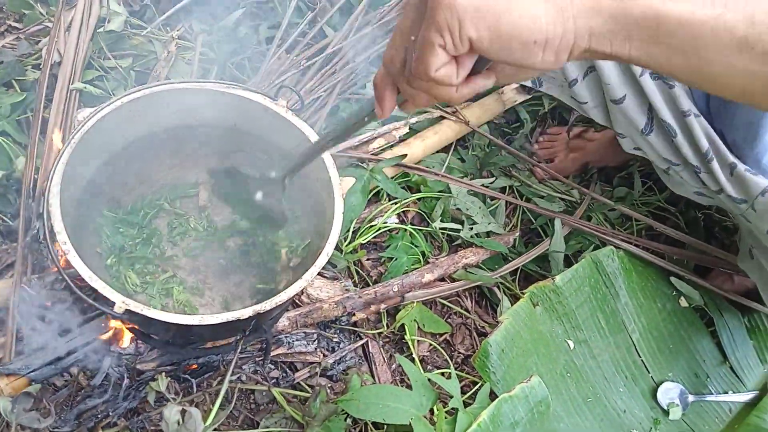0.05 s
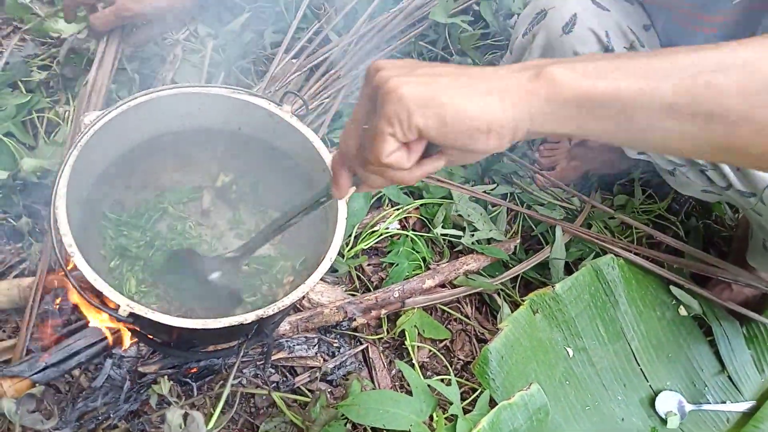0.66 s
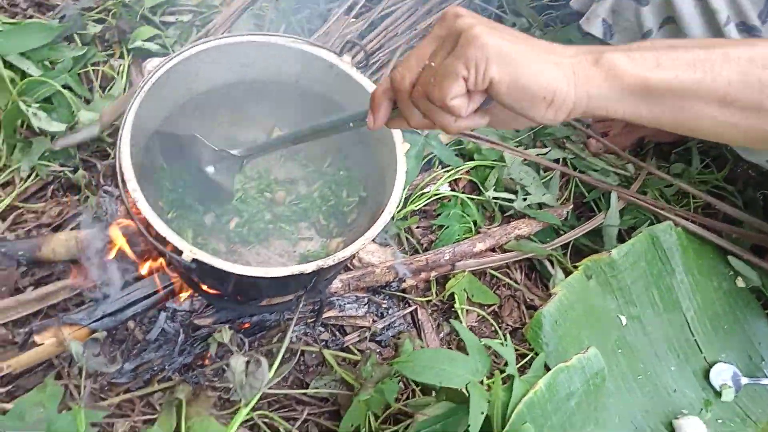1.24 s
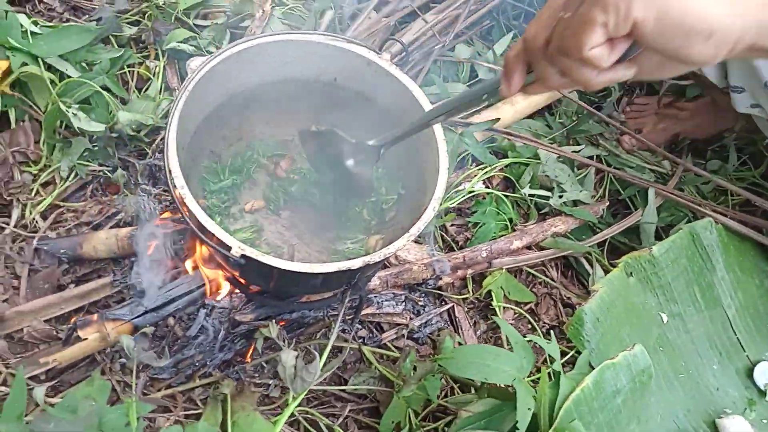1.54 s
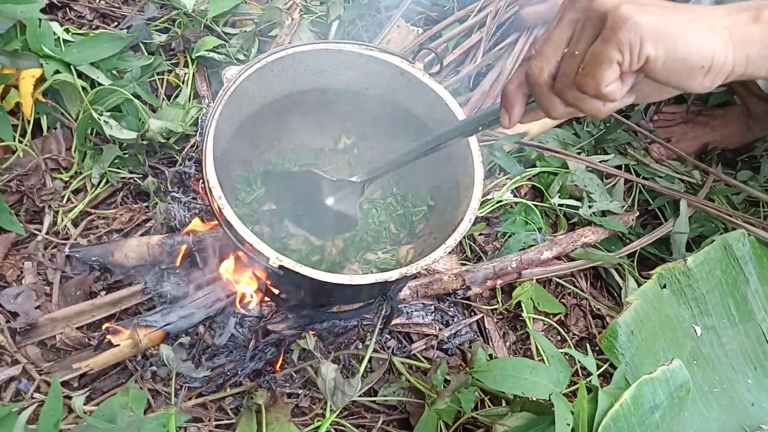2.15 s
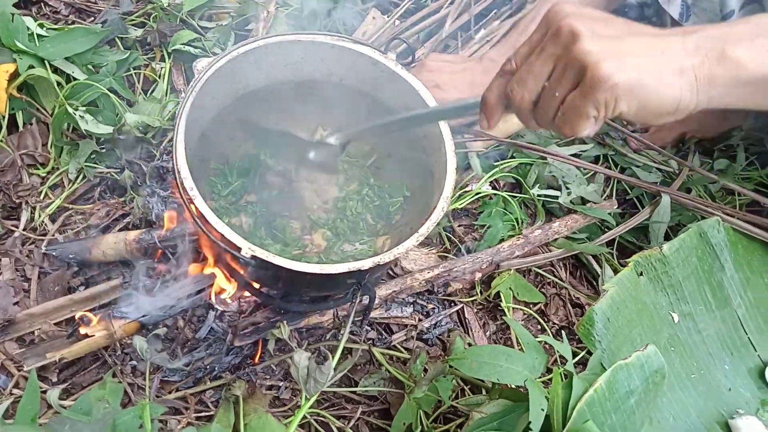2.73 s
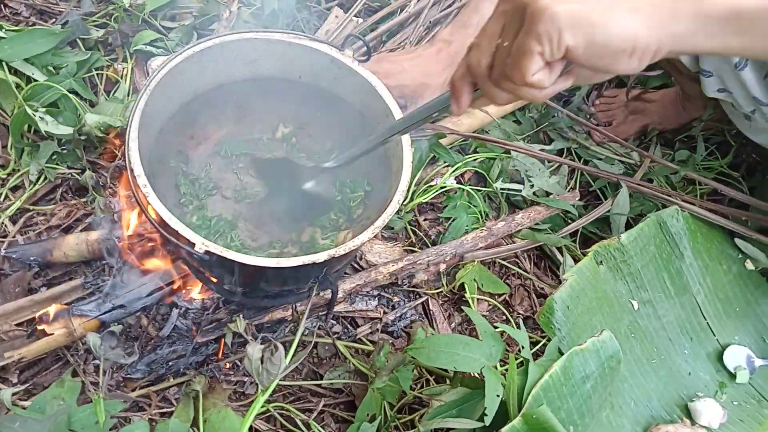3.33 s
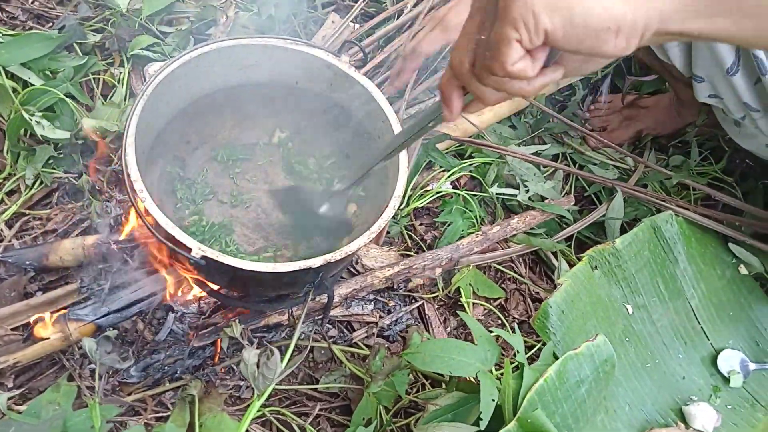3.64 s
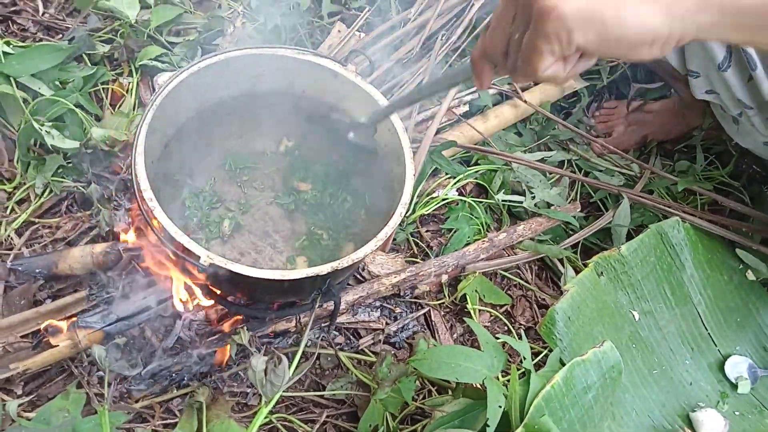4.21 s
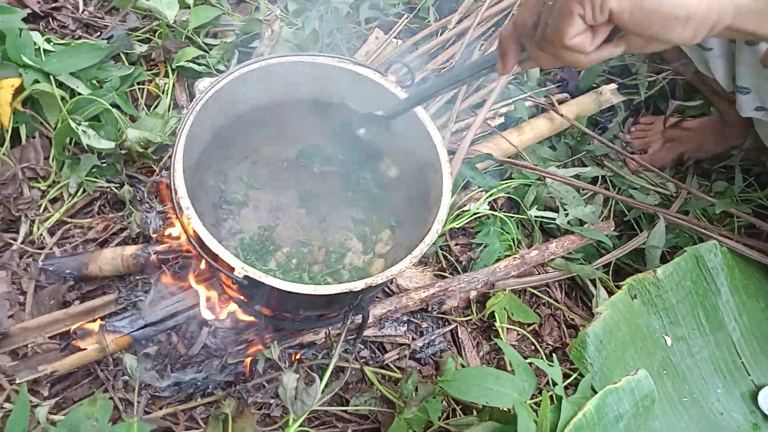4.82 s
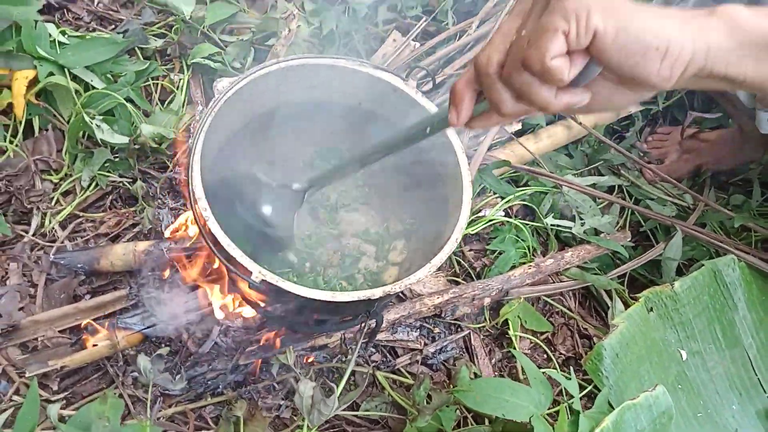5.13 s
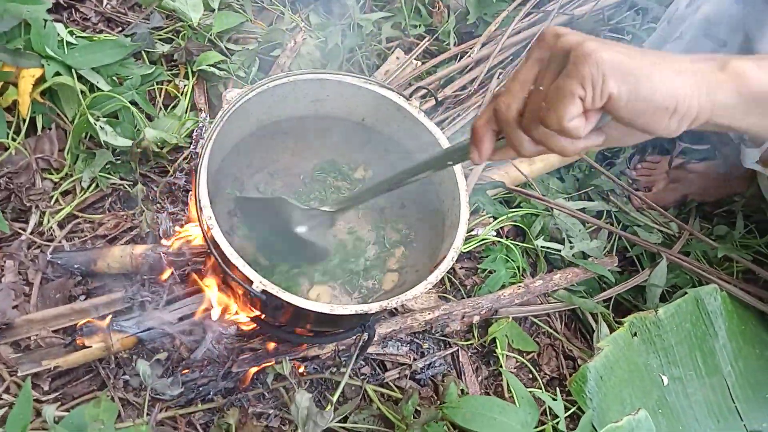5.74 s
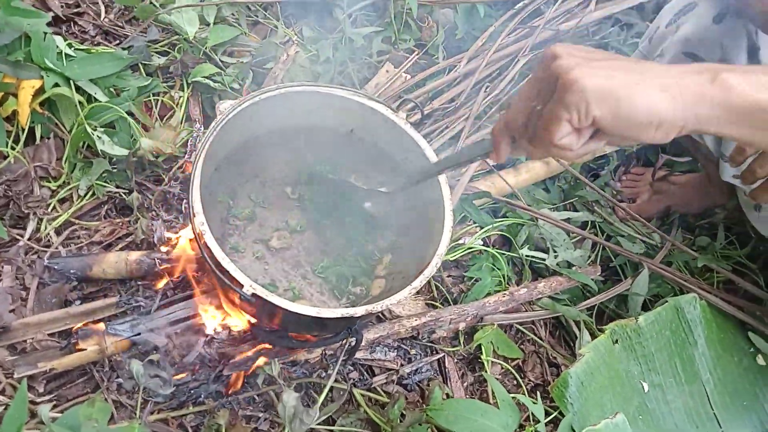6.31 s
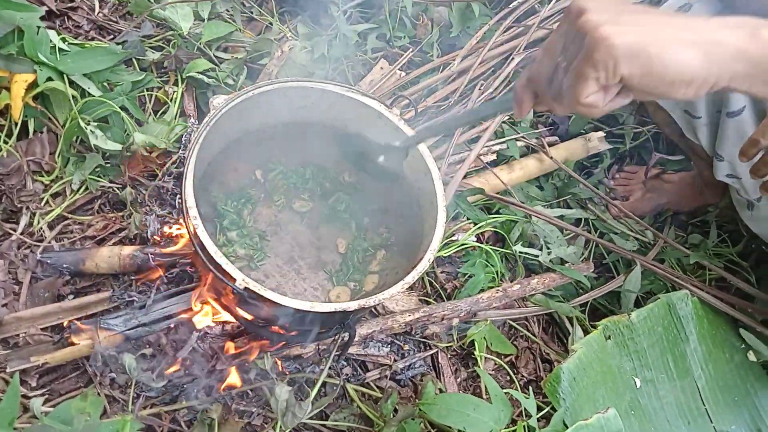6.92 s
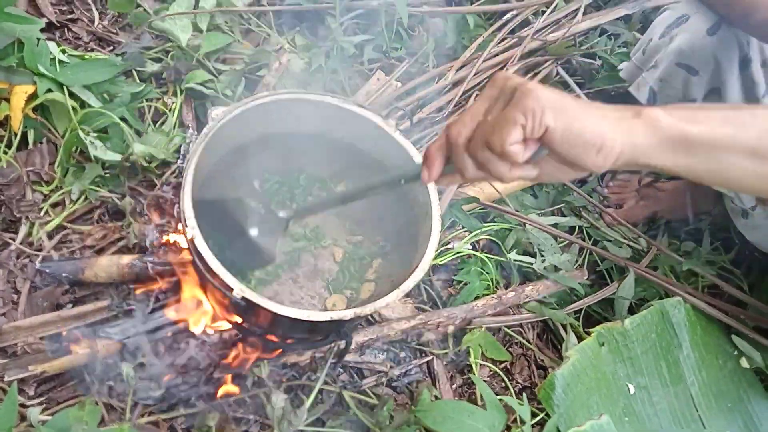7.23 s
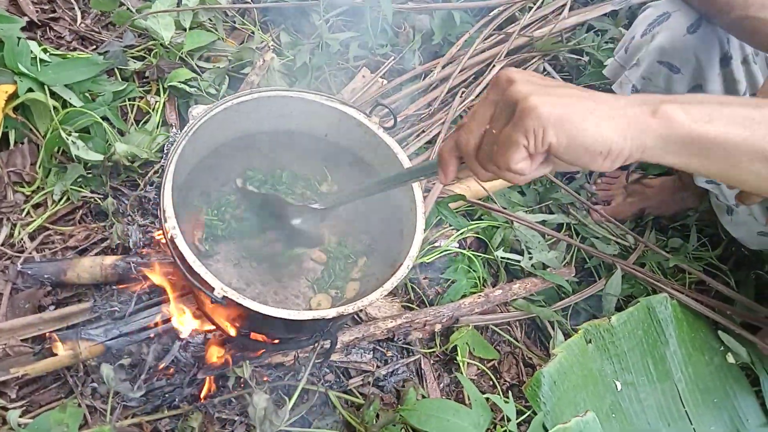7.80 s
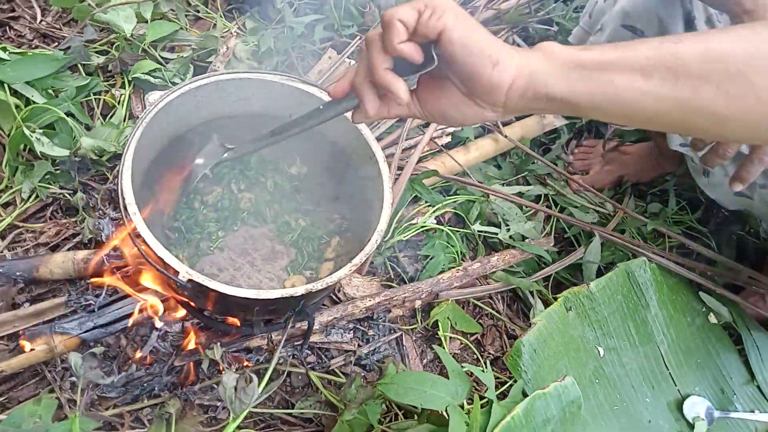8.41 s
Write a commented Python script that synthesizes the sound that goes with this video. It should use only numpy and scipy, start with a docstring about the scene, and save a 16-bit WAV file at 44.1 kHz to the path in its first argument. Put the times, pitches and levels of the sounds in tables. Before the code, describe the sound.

Close stirring of broth in an aluminium pot, with metal clatter, small plops and hissing above a faint wood fire.

```python
"""At an open wood fire, one microphone close above an aluminium pot: a metal ladle stirs broth.
The handle chatters on the rim, rings and squeaks; the bowl knocks and scrapes under the broth,
which damps the pot. The broth swirls and plops, and sizzles where it washes up the hot wall.
Underneath, the wood crackles and the flames rumble."""
import sys
import numpy as np
from scipy import signal
from scipy.fft import rfft, irfft
from scipy.io import wavfile
from scipy.ndimage import uniform_filter1d

SR = 44100
rng = np.random.default_rng(int(sys.argv[2]) if len(sys.argv) > 2 else 0)


def output_pcm(signal):
    """Save a mono or channel-first signal as 16-bit PCM at the path in sys.argv[1].

    Samples are clipped to [-1, 1] before scaling.
    """
    pcm = np.clip(np.atleast_2d(signal).T, -1, 1) * 32767
    wavfile.write(sys.argv[1], SR, np.round(pcm).astype(np.int16))


N = 377487
CUTOFF_HZ = 15700
BLOW_T = np.arange(SR * 3 // 10) / SR   # time axis of one short event, s

# spectrum of tiny bursts, shared by sizzling broth and snapping wood: frequency_hz, density_db
BURST_SPECTRUM = [(500, -14), (1000, -8), (1600, -4.5), (2500, 1), (3500, 2.5), (4500, -2), (5500, -8.5),
                  (6800, -8.5), (7700, -5.5), (8500, 4.5), (9500, -3.5), (11000, -6.5), (12800, -6.5),
                  (15300, -2)]


def handle_on_rim(crowd, clatter_db, ring_db, t60_s):
    """The handle clashes brightly on the rim in the open air, after which the ladle rings."""
    # clashes: start_s, level_db, treble_db, resonance_db, contact_s, low_ring_db, high_ring_db
    rim_hits = [(0.2147, -18.5, -2, 9, .016, -26.5, -23), (.511, -13, 3, 11.5, 0.021, -22, -21),
                (1.004, -22, -1.5, 11, 0.012, -16.5, -29), (1.255, -14, 3.5, 13, 0.016, -32, -31),
                (1.8536, -28.5, -0.5, 9, 0.017, -20, -33), (2.374, -17.5, -9, 2, 0.017, -27.5, -19.5),
                (2.927, -15, -3.5, 11, 0.0032, -16, -17), (3.586, -17.5, -1.5, 19.5, 0.013, -15, -27.5),
                (3.8903, -15.5, -1, 13, 0.0058, -35, -24), (4.2507, -14.5, -1.5, 11, 0.0074, -13.5, -26),
                (4.57, -14, -1, 12, 0.022, -23, -20), (4.9397, -18.5, -12, 0, 0.0042, -18, -21),
                (5.1941, -18.5, -1, 8.5, 0.023, -36, -27), (5.276, -29, 2, 13, .003, -28.5, -37),
                (5.6024, -17.5, -4.5, 6, 0.0099, -18.5, -16), (5.85, -14, 3, 15.5, 0.017, -31, -28),
                (6.259, -24.5, -11, -5, 0.026, -24, -28), (6.9479, -16.5, -1, -5, 0.01, -23.5, -14),
                (7.2593, -15.5, 3, 14.5, 0.0127, -30, -22), (7.682, -15, 0.5, -8, 0.0082, -16.5, -25),
                (7.955, -16, 4.5, 17.5, .019, -20, -19), (8.379, -15.5, -0.5, 1, 0.0072, -27.5, -18.5)]
    # clear modes of the ladle: pitch_hz, level_db, ring_time_share
    ladle_modes = [(1677, 2.5, 1.0), (2955, 0, 1.0), (3260, -2, .45), (5645, -14, .5), (6105, -10, .35),
                   (517, -14, 1.1), (2590, -5, .4), (2890, -6, .6), (3520, -5, .4), (4140, -7, .45),
                   (8290, -3, .35), (8490, -4, .35)]
    # spectrum of the quickly dying modes around them: frequency_hz, density_db
    rim_spectrum = [(200, -11.5), (330, -34), (510, -0.5), (800, -9.5), (950, -6), (1150, -1), (1500, -6.5),
                    (2200, 0), (3000, -3.5), (4300, -2), (5400, -9), (7200, -9), (8300, 0.5), (9500, -11),
                    (11500, -21)]
    out = np.zeros(N)
    for start_s, level_db, treble_db, resonance_db, contact_s, low_db, high_db in rim_hits:
        resonance_hz = 1260 * (1 + 0.0098 * rng.standard_normal())   # shifts with the point of contact
        bass_db = 1.5 - 0.45 * (level_db + 18)   # harder clashes carry less bass for their level
        force = chatter(contact_s, per_s=1700, uneven_db=2.8, impact=0.5,
                        slide_db=-12, slide_s=0.018, ease_s=0.0005)
        clash = clatter(force, crowd, rim_spectrum, bass_db, treble_db,
                        resonance_hz, resonance_db, overtone_db=5.5, log_width=0.048)
        ring = ringing(contact_s, ladle_modes, low_db, high_db, t60_s)
        add(out, start_s, from_db(level_db + clatter_db) * clash + from_db(ring_db) * ring)
    return out


def bowl_in_pot(crowd, clatter_db, ring_db, t60_s):
    """Duller touches under the broth: brief ones knock, long ones ease into a gritty scrape."""
    # bowl against wall and bottom; the deeper in the broth, the more bass:
    # start_s, level_db, bass_db, treble_db, contact_s, ring_db
    knocks = [(.356, -25, -7, -7, 0.019, -43), (.371, -22.5, 2, 2.5, 0.0072, -36),
              (.5954, -17, 0, 5.5, 0.0035, -38), (.6431, -24.5, 17, -29, 0.0011, -43),
              (.6959, -24.5, 10, -11, 0.0055, -42), (.7265, -31.5, 4, 0, 0.0095, -33.5),
              (1.1169, -12, -20, -3.5, 0.0023, -30), (1.131, -19.5, -18, 5, 0.0017, -46),
              (1.325, -32.5, 17, 7, .002, -67), (1.383, -17, 8.5, -5, 0.00093, -38),
              (1.472, -24, -13, -1, 0.014, -30.5), (1.4945, -16, -14, -4, 0.0031, -31.5),
              (1.9292, -27.5, 8.5, 5, 0.017, -45), (2.0249, -32.5, 7, 7, 0.023, -51),
              (2.63, -23.5, -11, 1.5, .004, -36), (3.057, -19.5, -4, -31, 0.00088, -44.5),
              (3.2088, -23, 11.5, 3, 0.016, -25), (3.277, -27, 10, -21, 0.031, -32.5),
              (3.9959, -15, 12, -14, .0013, -35), (4.018, -21, 7.5, -0.5, 0.017, -31),
              (4.053, -30, -14, 8, .0033, -36.5), (4.3843, -18, -5.5, -1, 0.021, -30),
              (4.6422, -20, 10.5, -15, 0.026, -27.5), (5.026, -22.5, 7, 1, 0.014, -44),
              (5.258, -18, -5, 9, 0.00068, -67), (5.276, -38, 5, 8, .003, -63),
              (5.3577, -23.5, 10, 0, 0.014, -32.5), (6.602, -37, 11, 12, 0.027, -62),
              (7.089, -26, 3, 4, 0.0046, -49), (7.3825, -21, 18, -5, 0.0037, -44),
              (7.437, -19, -18.5, 3, 0.0037, -26.5), (8.0205, -22, -5, 9, 0.0011, -55),
              (8.1003, -35.5, 14, -15, 0.0061, -47), (8.503, -20.5, 12, -20, 0.0073, -34)]
    # clear modes of the filled pot: pitch_hz, level_db, ring_time_share
    pot_modes = [(919, 1, .8), (1678, -2, 1.0), (2892, 4, .65), (4145, -3, .65), (520, -2, .7),
                 (565, -5, .5), (1745, -5, .5), (2830, -4, .5), (2955, -7, .9), (3270, -9, .45),
                 (5660, -14, .5)]
    # spectrum of the quickly dying modes around them: frequency_hz, density_db
    pot_spectrum = [(150, -23), (330, -16), (530, 8.5), (750, 1), (915, -1), (1080, 9.5), (1520, -10),
                    (1900, -0.5), (2900, 6), (3600, -9.5), (4200, 1.5), (6000, -16.5), (8500, -4),
                    (11000, -24.5)]
    out = np.zeros(N)
    for start_s, level_db, bass_db, treble_db, contact_s, pot_db in list(knocks) + scrape_slips():
        bowl_hz = 1826 - 7.5 * bass_db   # broth loads the bowl, so its pitch sinks
        tilt_db = 0.34 * bass_db   # and the pot's low modes gain on its high ones
        impact = 1.35 * np.exp(-contact_s / 0.043)
        force = chatter(contact_s, per_s=650, uneven_db=3.0, impact=impact,
                        slide_db=-26, slide_s=0.015, ease_s=0.2 * contact_s)
        knock = clatter(force, crowd, pot_spectrum, bass_db, treble_db,
                        bowl_hz, resonance_db=21.5, overtone_db=5.0, log_width=0.087)
        ring = ringing(contact_s, pot_modes, pot_db + tilt_db, pot_db - tilt_db, t60_s)
        add(out, start_s, from_db(level_db + clatter_db) * knock + from_db(ring_db) * ring)
    return out


def scrape_slips(count=4, contact_s=0.005, jitter=0.15, spread_db=2):
    """Each scrape breaks into a few small knocks, uneven in time and strength."""
    # bowl dragged over the bottom: start_s, length_s, level_db, bass_db, treble_db, ring_db
    scrapes = [(3.139, 0.071, -25.5, 5.5, 12.5, -53), (3.327, .06, -24.5, -0.5, -11, -36),
               (3.933, .05, -28.5, 8.5, 5.5, -46), (4.7044, .082, -21, -2.5, 7.5, -29.5),
               (8.444, 0.049, -27.5, 4.5, 8, -36.5)]
    slips = []
    for start_s, length_s, level_db, bass_db, treble_db, ring_db in scrapes:
        for k, (late, strong) in enumerate(rng.standard_normal((count, 2))):
            slip_s = start_s + length_s * (k + jitter * late) / count
            slips.append((slip_s, level_db + spread_db * strong, bass_db, treble_db, contact_s, ring_db))
    return slips


def chatter(contact_s, per_s, uneven_db, impact, slide_db, slide_s, ease_s):
    """Force of one touch: a first impact, a burst of tiny bounces, then a fading slide."""
    after_s = np.maximum(BLOW_T - contact_s, 0)
    release = np.exp(-after_s / 0.0015) + from_db(slide_db) * np.exp(-after_s / slide_s)
    pressure = release * (1 - np.exp(-BLOW_T / ease_s))
    force = grains(per_s, uneven_db, size=len(BLOW_T)) * pressure
    force[0] += impact * np.linalg.norm(force) + 1e-3
    return force


def mode_crowd(count=700, size=4500):
    """Closely packed, heavily damped modes of thin metal: their pitches and their free swings."""
    # time the modes take to die away: frequency_hz, t60_s
    decay_times = [(300, 0.12), (520, 0.093), (1200, 0.036), (3000, 0.055), (8500, 0.061), (14000, 0.054)]
    root_hz = np.linspace(np.sqrt(120), np.sqrt(CUTOFF_HZ), count)
    hz = (root_hz + (root_hz[1] - root_hz[0]) * rng.uniform(-0.23, 0.79, count)) ** 2
    t = BLOW_T[:size]
    t60_s = at_hz(decay_times, hz)[:, None]
    swings = np.sin(2 * np.pi * (hz[:, None] * t + rng.random((count, 1)))) * decay(t, t60_s)
    return hz, swings * np.sqrt(root_hz[:, None] / t60_s)   # equal energy per Hz


def clatter(force, crowd, spectrum, bass_db, treble_db,
            resonance_hz, resonance_db, overtone_db, log_width):
    """The force shakes the mode crowd, weighted by where and how hard the metal touches."""
    hz, swings = crowd
    shelves_db = at_hz([(600, bass_db), (950, 0), (3300, 0), (5500, treble_db)], hz)
    # the point of contact sets one resonance and its overtone
    peaks = [(resonance_hz, resonance_db), (1.814 * resonance_hz, overtone_db)]
    peaks_db = sum(db / (1 + (np.log(hz / centre_hz) / log_width) ** 2) for centre_hz, db in peaks)
    # and favours a different scatter of neighbouring modes each time
    scatter_db = 2.5 * rms_one(uniform_filter1d(rng.standard_normal(len(hz)), size=6))
    strengths = from_db(at_hz(spectrum, hz) + shelves_db + peaks_db + scatter_db)
    sound = signal.fftconvolve(force, strengths @ swings)[:len(force)]
    # the clatter carries no deep bass
    sound = signal.sosfilt(signal.butter(3, 170, "high", fs=SR, output="sos"), sound)
    return sound / np.sqrt(np.mean(sound[:SR // 25] ** 2))   # rms 1 over the first 40 ms


def ringing(contact_s, modes, low_db, high_db, t60_s):
    """Clear modes swell while the metal chatters; the contact favours those below or above 2 kHz."""
    swell = 1 - np.exp(-BLOW_T / (0.68 * contact_s))
    ring = np.zeros(len(BLOW_T))
    for hz, level_db, share in modes:
        gain = from_db(level_db + (low_db if hz < 2000 else high_db) + rng.standard_normal())
        ring += gain * decay(BLOW_T, t60_s * share) * np.sin(2 * np.pi * (hz * BLOW_T + rng.random()))
    return swell * ring


def handle_squeaks(waver):
    """Short unsteady whistles as the handle slides over the rim."""
    # metal sticking and slipping on metal: start_s, length_s, start_hz, end_hz, level_db
    squeaks = [(0.96, .04, 6140, 7250, -32), (0.974, 0.029, 5640, 5550, -27),
               (1.013, 0.076, 5700, 5600, -35.5), (4.278, 0.136, 5500, 5740, -34),
               (4.543, 0.04, 4800, 5700, -34), (4.576, 0.058, 6000, 5950, -29.5)]
    out = np.zeros(N)
    for start_s, length_s, start_hz, end_hz, level_db in squeaks:
        progress = np.minimum(BLOW_T / length_s, 1)
        glide_hz = start_hz + (end_hz - start_hz) * progress
        hz = glide_hz * (1 + waver * drift(290)[:len(BLOW_T)])
        whistle = np.sin(2 * np.pi * np.cumsum(hz) / SR)
        add(out, start_s, from_db(level_db) * np.sin(np.pi * progress) * whistle)
    return out


def broth(swirl_db, bubble_db, bubbles=130):
    """A soft swirl in the hollow of the pot, with small bubbles scattered through it and large plops."""
    # course of the swirling: time_s, level_db
    swirl_levels = [(0.0, -60.5), (1.27, -51), (1.64, -56), (3.1, -50.5), (4.02, -60.5), (4.9, -51.5),
                    (4.97, -56.5), (8.3, -54)]
    # spectrum of the swirling: frequency_hz, density_db
    swirl_spectrum = [(200, -5.5), (350, -2.5), (520, 8.5), (700, 1), (1000, -0.5), (1500, -3),
                      (2500, -1.5), (6000, -80)]
    # round, damped plops as the bowl bumps through the broth: start_s, pitch_hz, peak_db
    plops = [(.551, 488, -20), (.642, 510, -12), (1.322, 492, -16), (1.384, 445, -20.5),
             (2.391, 435, -23.5), (2.56, 520, -35.5), (2.765, 513, -34.5), (2.978, 516, -29),
             (3.995, 467, -32), (4.642, 770, -19.5), (4.656, 650, -21), (5.36, 366, -24.5),
             (5.897, 507, -29), (6.299, 500, -36), (6.707, 477, -31), (7.384, 470, -14.5),
             (8.1, 496, -21.5), (8.343, 770, -34.5), (8.502, 409, -24)]
    swirl = rms_one(colour(grains(700, 0.45), swirl_spectrum))
    for when, pitch, faintness in rng.random((bubbles, 3)):
        add(swirl, when * N / SR, from_db(bubble_db - 12 * faintness) * plop(420 * 2 ** (pitch ** 2)))
    out = from_db(in_time(swirl_levels) + swirl_db + 2.0 * drift(16)) * swirl
    for start_s, pitch_hz, peak_db in plops:
        add(out, start_s, from_db(peak_db) * plop(pitch_hz))
    return out


def plop(hz, rise_s=0.0035):
    """A pocket of air rings briefly and rises in pitch."""
    swell = (BLOW_T / rise_s) * np.exp(1 - BLOW_T / rise_s)
    return swell * np.sin(2 * np.pi * hz * BLOW_T * (1 + 3.6 * BLOW_T))


def sizzle(body_db, spray_db, grit, flicker_db):
    """Countless droplets burst on the hot wall, most after each wash; larger ones stand out as grit."""
    # broth washes up the wall and boils off: start_s, wet_s, body_db, fine_spray_db
    washes = [(0, 0.14, -38.5, -42), (.32, .17, -45, -40.5), (.8, 0.17, -35.5, -48.5),
              (1.04, 0.1, -36.5, -43), (1.48, 0.084, -49, -44), (1.94, 0.23, -43.5, -45.5),
              (2.33, 0.18, -37, -48.5), (2.49, 0.25, -46, -42), (3.12, 0.056, -36, -48),
              (3.47, 0.3, -41, -49), (3.689, 0.098, -42, -37), (3.88, 0.94, -38.5, -43),
              (4.6, 0.22, -28, -37), (4.98, 0.06, -34.5, -39), (5.38, .2, -38, -46),
              (5.688, 0.13, -35, -34.5), (6.02, 0.11, -40, -42), (6.33, 0.075, -36, -39.5),
              (7.07, 0.031, -39, -38), (7.2, .43, -46.5, -48), (6.5, .35, -63, -53),
              (7.808, 0.01, -39.5, -48), (8.02, 0.033, -49, -48)]
    bursts = rng.standard_normal(N) + grit * rms_one(grains(820, 4.5))
    hiss = colour(bursts * from_db(flicker_db * drift(70)), BURST_SPECTRUM)
    body = rms_one(signal.sosfilt(signal.butter(4, 6300, "low", fs=SR, output="sos"), hiss))
    spray = rms_one(signal.sosfilt(signal.butter(4, 6300, "high", fs=SR, output="sos"), hiss))
    # a steady simmer along the waterline lies under the washes
    waver_db = 1.25 * drift(9.8)
    body_power = from_db(-46.5 + waver_db) ** 2
    spray_power = from_db(-50.5 + waver_db) ** 2
    for start_s, wet_s, wash_body_db, wash_spray_db in washes:
        wetness = wall_wetness(wet_s)
        add(body_power, start_s, (from_db(wash_body_db) * wetness) ** 2)
        add(spray_power, start_s, (from_db(wash_spray_db) * wetness) ** 2)
    return from_db(body_db) * np.sqrt(body_power) * body + from_db(spray_db) * np.sqrt(spray_power) * spray


def wall_wetness(wet_s, wetting_s=0.012, drying_s=0.079):
    """One wash wets the wall, holds and dries off."""
    t = np.arange(SR) / SR
    return np.minimum(t / wetting_s, 1) * np.exp(-np.maximum(t - wet_s, 0) / drying_s)


def fire(crackle_db, snap_db):
    """Fluttering flames rumble under small, dry snaps of the wood."""
    # course of the flames: time_s, level_db
    flame_levels = [(0.4, -48), (2.01, -49), (8.18, -43), (8.2, -44.5)]
    # spectrum of their rumble: frequency_hz, density_db
    flame_spectrum = [(25, -39), (45, -23), (65, -8), (90, 3), (150, -1.5), (230, -11.5), (400, -28),
                      (800, -53)]
    # the loudest snaps of the burning wood, each a single tick: start_s, level_db
    snaps = [(2.073, -17), (2.123, -14), (2.579, -15), (2.665, -21), (2.697, -19), (3.104, -16),
             (7.642, -20), (8.269, -17)]
    flutter = from_db(in_time(flame_levels) + 1.5 * drift(12))
    rumble = flutter * rms_one(colour(rng.standard_normal(N), flame_spectrum))
    ticks = from_db(crackle_db) * grains(30, 3.0)
    for start_s, level_db in snaps:
        add(ticks, start_s, from_db([level_db + snap_db]))
    return rumble + colour(ticks, BURST_SPECTRUM)


def grains(per_s, spread_db, size=N):
    """Random clicks of uneven strength."""
    born = rng.random(size) < per_s / SR
    polarity = rng.choice([-1, 1], size)
    return born * polarity * from_db(spread_db * np.minimum(rng.exponential(1, size), 4))


def drift(rate_hz):
    """A random wander with a spread near 1."""
    return np.interp(np.arange(N) / SR * rate_hz, np.arange(2000), rng.standard_normal(2000))


def colour(x, spectrum, size=8192):
    """Causal (minimum-phase) filter of unit energy with the given spectrum."""
    magnitude = from_db(at_hz(spectrum, np.fft.rfftfreq(size, 1 / SR)))
    cepstrum = irfft(np.log(magnitude))
    lag = np.arange(size)
    causal = 2 * cepstrum * (lag < size // 2) - cepstrum[0] * (lag == 0)
    response = irfft(np.exp(rfft(causal)))
    return signal.fftconvolve(x, response / np.linalg.norm(response))[:len(x)]


def decay(t, t60_s):
    """Free decay, 60 dB down after t60_s."""
    return np.exp(-np.log(1000) * t / t60_s)


def in_time(points):
    """Reads a curve at every sample."""
    time_s, value = np.transpose(points)
    return np.interp(np.arange(N) / SR, time_s, value)


def at_hz(points, hz):
    """Reads a table on a log-frequency axis."""
    frequency_hz, value = np.transpose(points)
    return np.interp(np.log(np.maximum(hz, 1)), np.log(frequency_hz), value)


def add(out, start_s, sound):
    """Mixes a sound in from start_s."""
    i = max(int(start_s * SR), 0)
    out[i:i + len(sound)] += sound[:max(N - i, 0)]


def from_db(db):
    return 10 ** (np.asarray(db) / 20)


def rms_one(x):
    return x / np.sqrt(np.mean(x ** 2) + 1e-20)


def scene():
    """Ladle, broth and fire, all close below the microphone and the same in both channels."""
    crowd = mode_crowd()
    mono = handle_on_rim(crowd, clatter_db=-1.75, ring_db=0.5, t60_s=0.26)
    mono += bowl_in_pot(crowd, clatter_db=-3.18, ring_db=12.5, t60_s=0.12)
    mono += broth(swirl_db=3.5, bubble_db=8)
    mono += sizzle(body_db=-4.0, spray_db=4.0, grit=0.4, flicker_db=1.47)
    mono += handle_squeaks(waver=0.008)
    mono += fire(crackle_db=-23.5, snap_db=7)
    return np.array([mono, mono])


def record(dry):
    """The loudest peaks are rounded off and the highest treble is cut."""
    rounded = dry / (1 + (dry / 0.85) ** 4) ** (1 / 4)
    return signal.sosfilt(signal.ellip(12, 0.1, 80, CUTOFF_HZ, fs=SR, output="sos"), rounded)


dry = scene()
out = record(dry)
output_pcm(out)
```